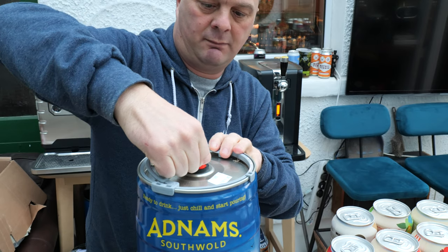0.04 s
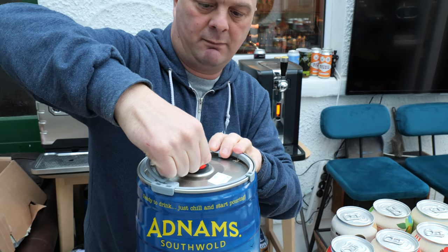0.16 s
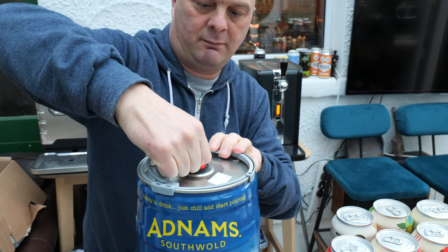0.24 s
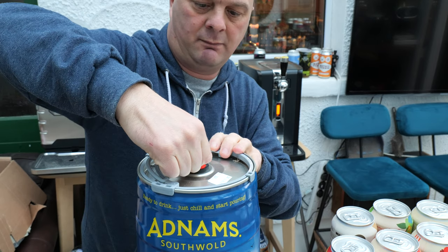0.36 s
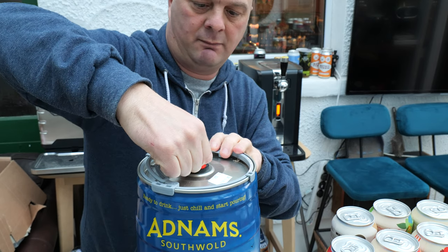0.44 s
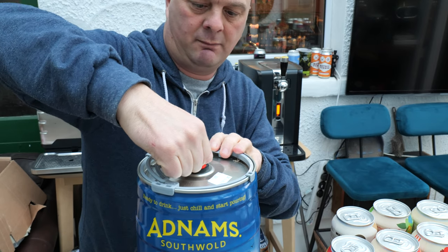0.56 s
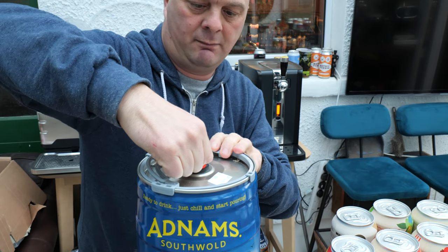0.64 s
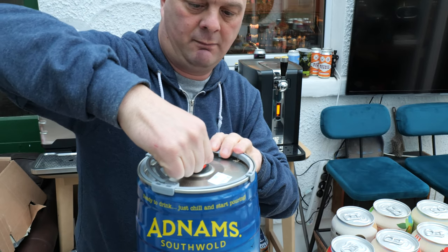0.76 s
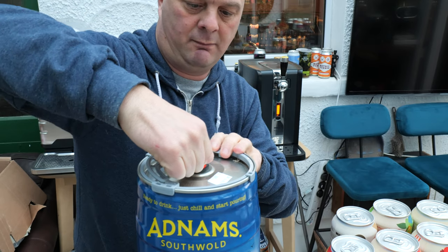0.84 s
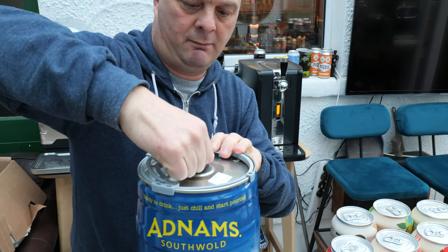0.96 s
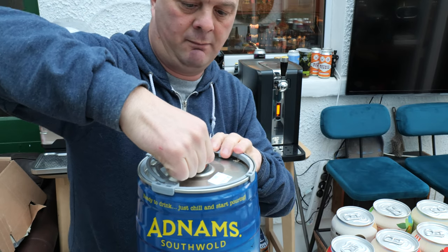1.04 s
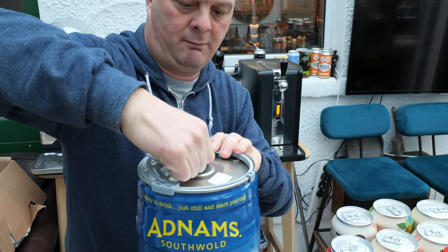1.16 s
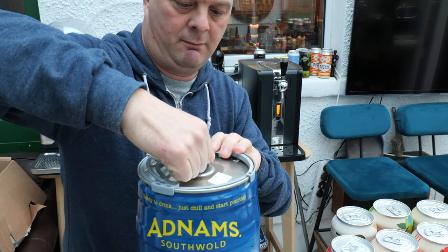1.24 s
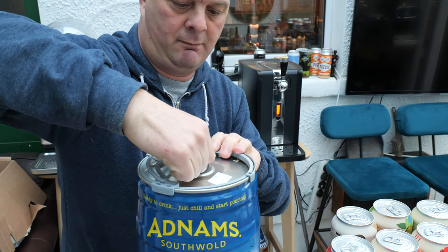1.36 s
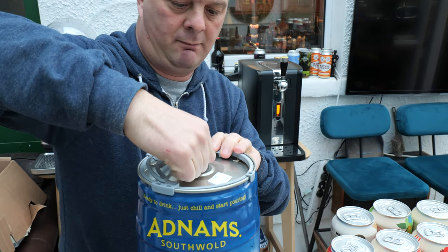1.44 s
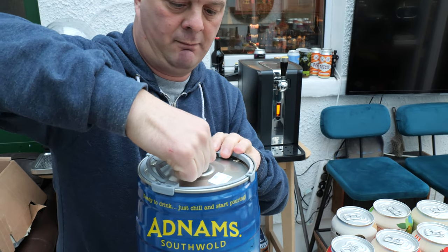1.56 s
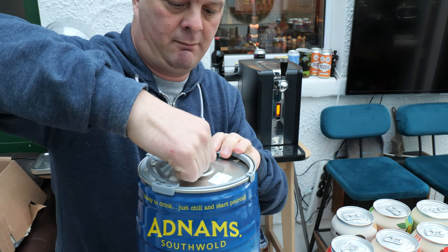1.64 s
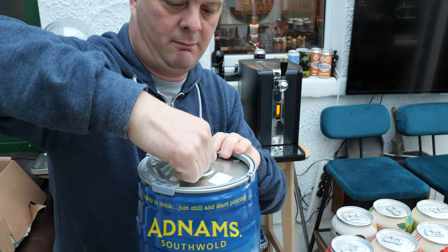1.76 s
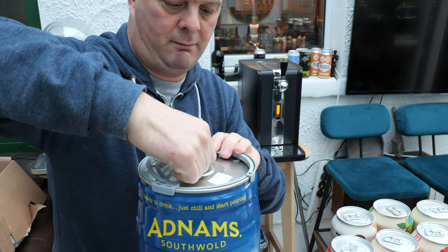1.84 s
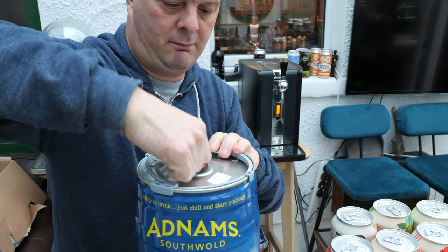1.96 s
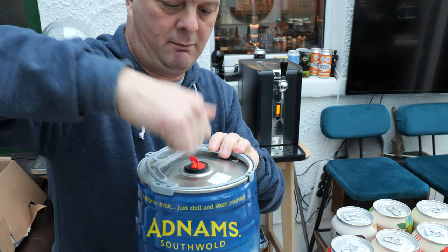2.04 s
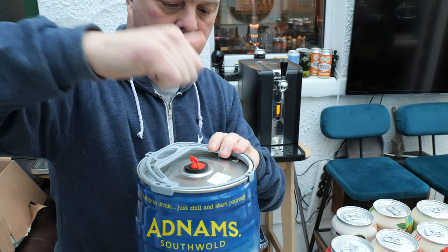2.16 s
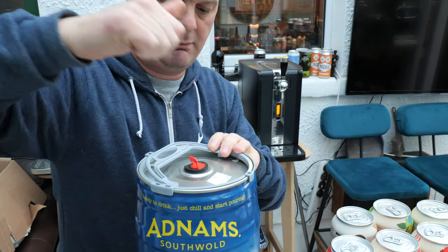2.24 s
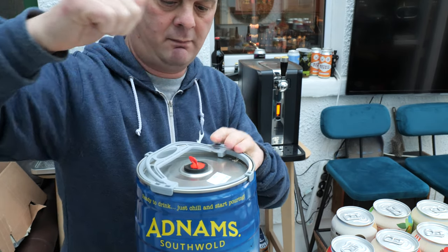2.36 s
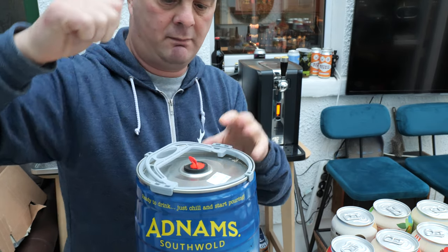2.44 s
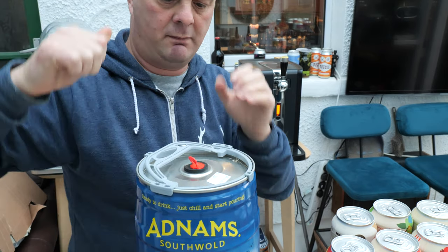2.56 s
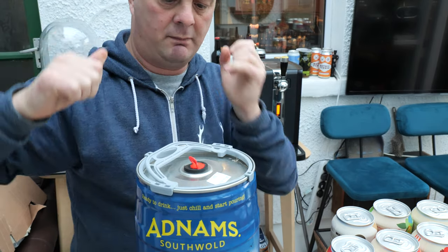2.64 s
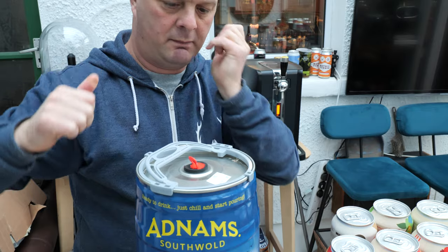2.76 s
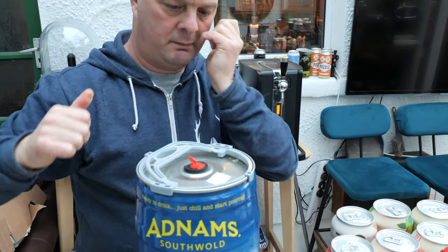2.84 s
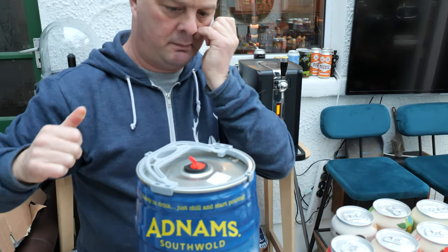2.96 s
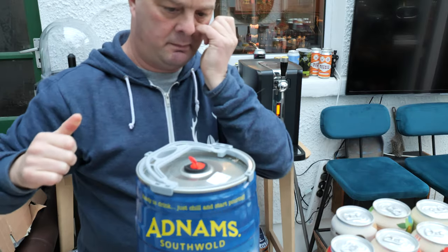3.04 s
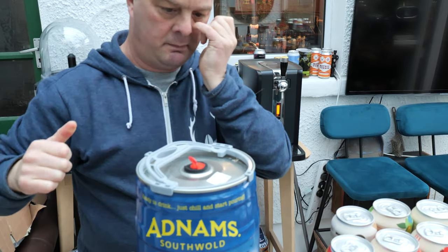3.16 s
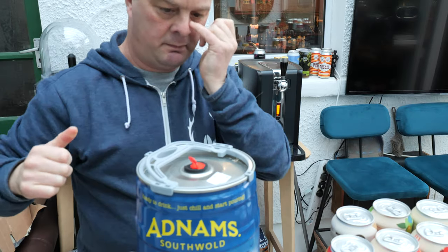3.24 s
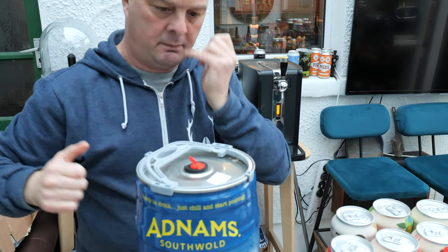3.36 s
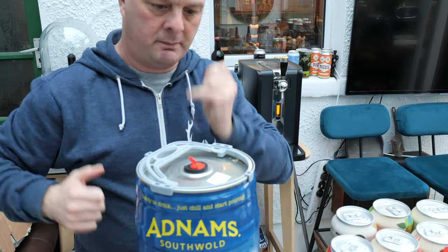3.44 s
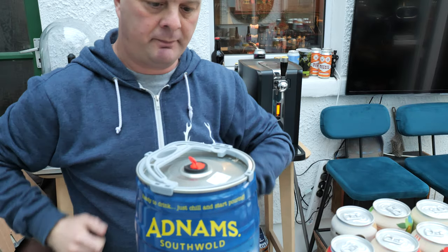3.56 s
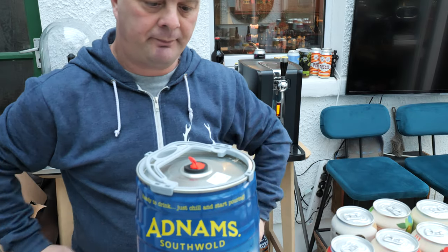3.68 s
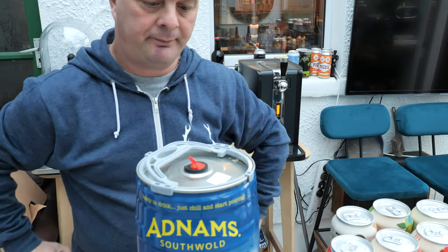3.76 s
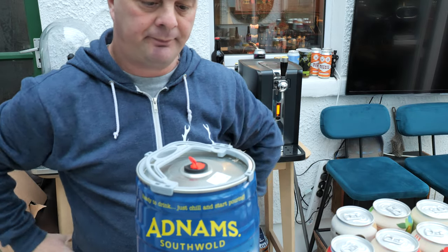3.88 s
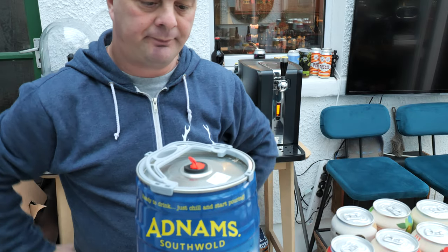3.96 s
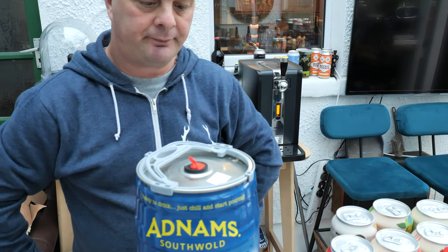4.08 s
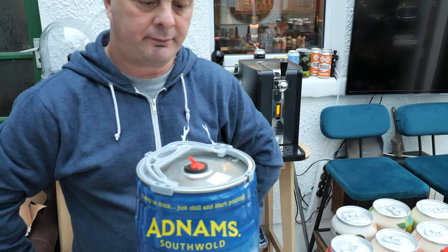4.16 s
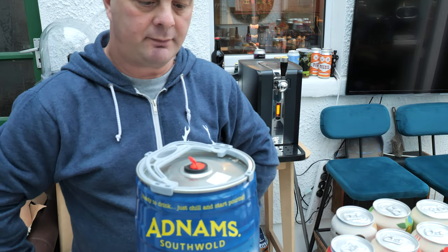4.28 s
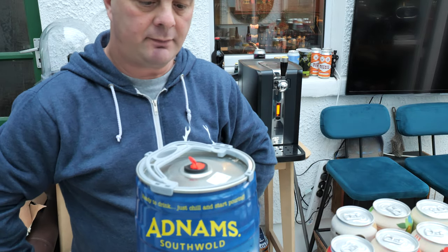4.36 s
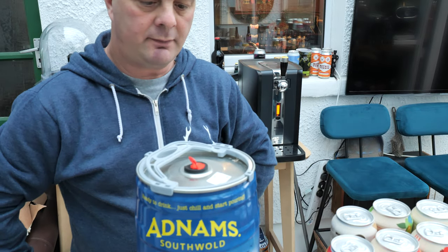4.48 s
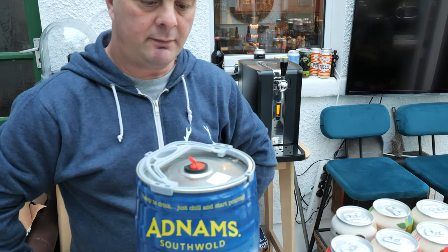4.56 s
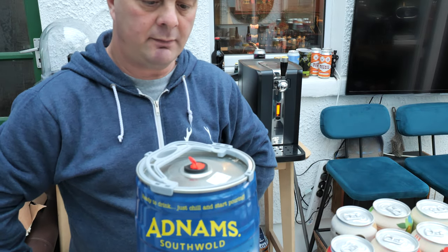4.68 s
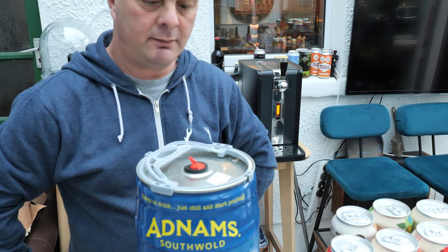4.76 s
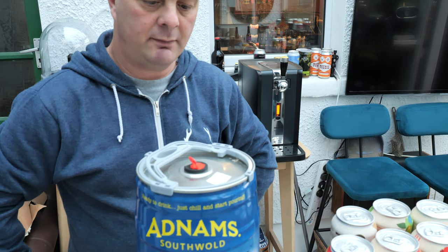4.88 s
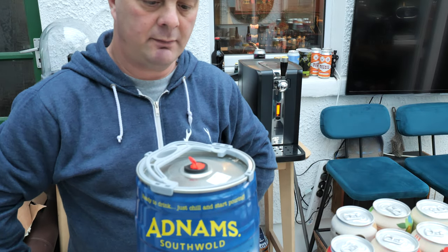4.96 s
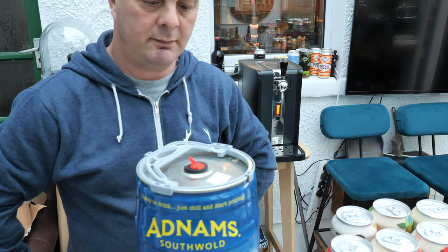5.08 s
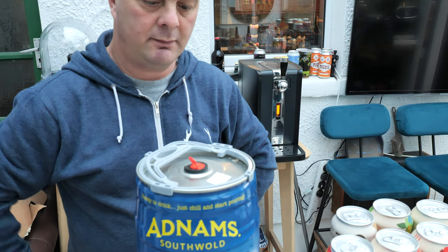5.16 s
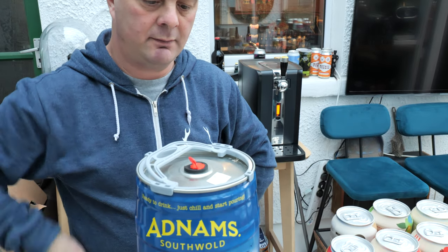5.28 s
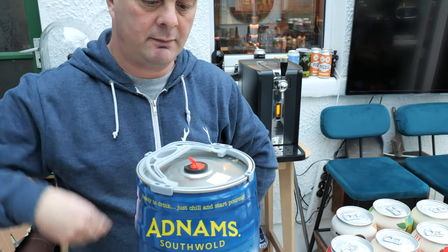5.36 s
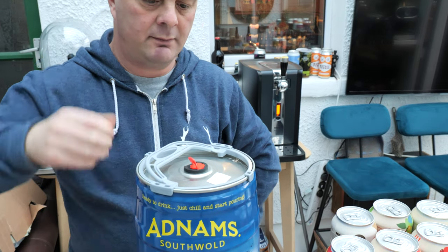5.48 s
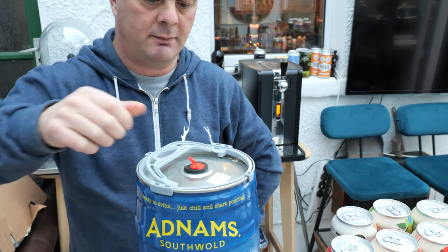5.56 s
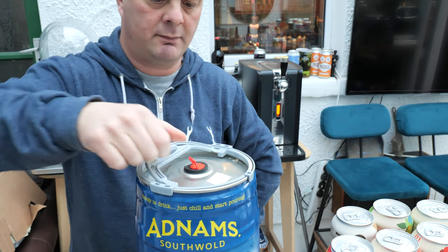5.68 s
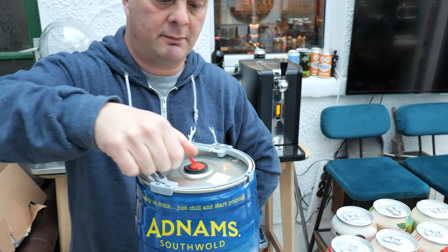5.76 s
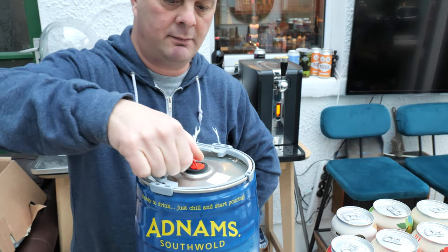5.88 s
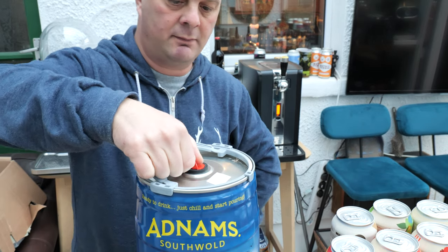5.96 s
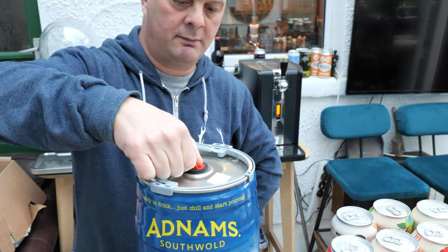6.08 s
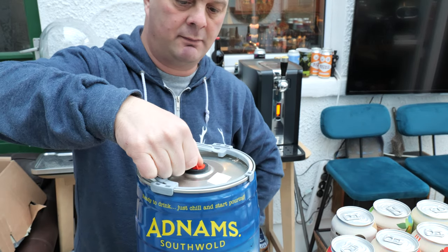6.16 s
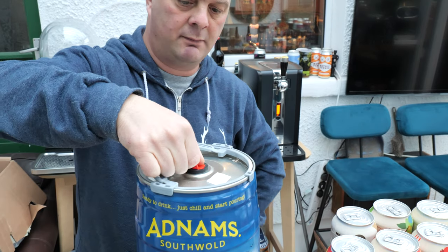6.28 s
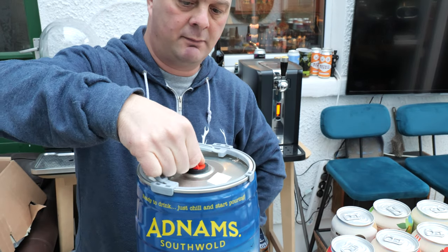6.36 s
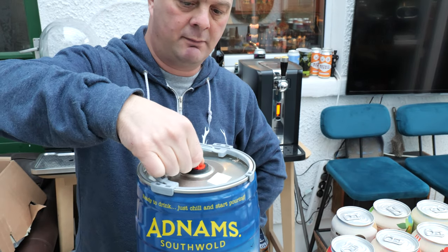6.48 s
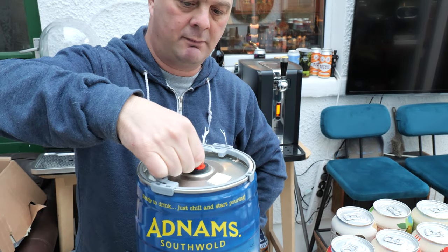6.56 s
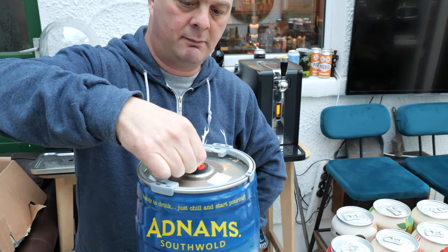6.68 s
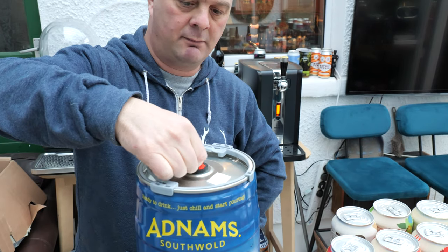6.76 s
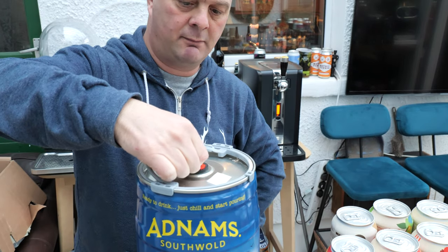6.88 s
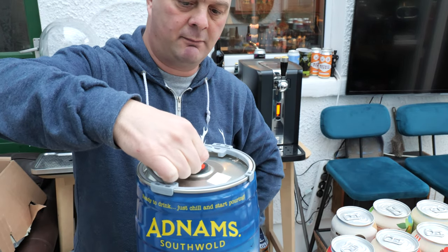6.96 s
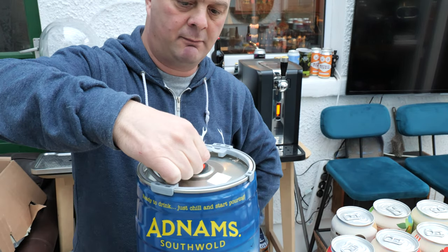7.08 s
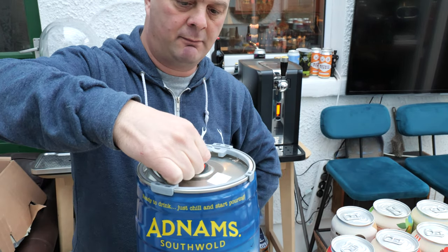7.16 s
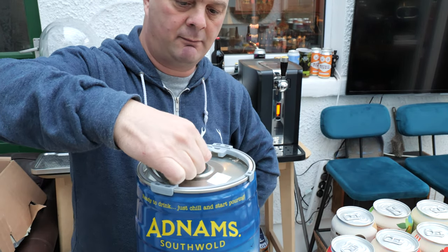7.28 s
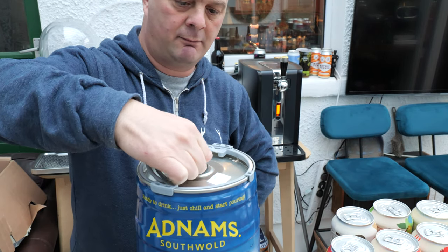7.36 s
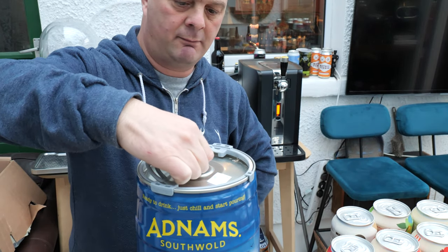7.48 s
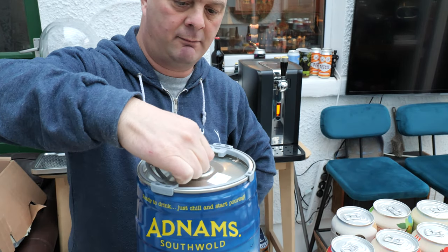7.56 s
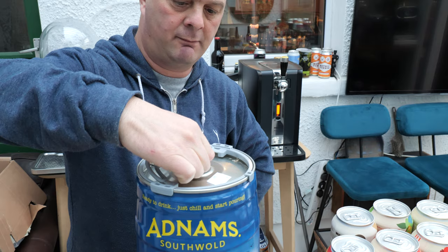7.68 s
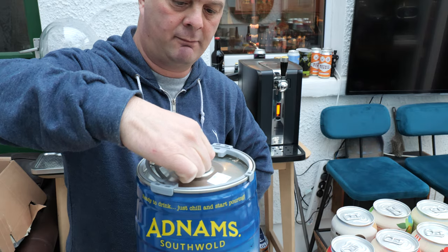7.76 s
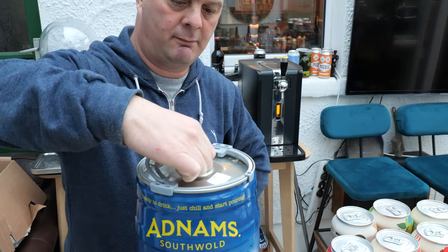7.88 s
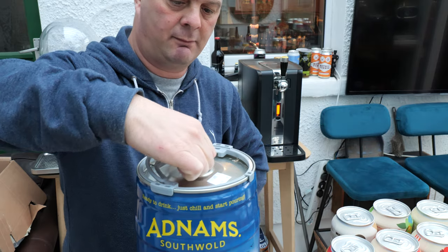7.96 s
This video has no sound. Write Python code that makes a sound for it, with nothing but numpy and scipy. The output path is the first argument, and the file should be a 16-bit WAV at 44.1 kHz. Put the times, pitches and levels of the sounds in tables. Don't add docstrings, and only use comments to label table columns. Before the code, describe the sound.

Gas bursts from a small steel keg's tap in a strong bright hiss, then slowly fades over a low humming cooler in a room.

```python
import sys
import numpy as np
from scipy import signal
from scipy.io import wavfile
from scipy.ndimage import uniform_filter1d

SR = 44100
rng = np.random.default_rng(int(sys.argv[2]) if len(sys.argv) > 2 else 0)


def makeup_ratio(level_db):
    decades = np.asarray(level_db, float) / 20
    return 10 ** decades


def materialize(psi):
    bounded = np.clip(np.atleast_2d(psi).T, -1, 1)
    quanta = np.round(bounded * 32767).astype(np.int16)
    wavfile.write(sys.argv[1], SR, quanta)


N = 354152

# (frequency [Hz], density [dB per Hz])
ROOM_COLOUR = [(20, -43), (38, -26), (58, -8), (95, -12.5), (200, -4.5), (250, -8.5), (450, -14.5),
               (1400, -15.5), (2300, -24.5), (3000, -22), (4200, -33), (6000, -42), (16000, -62)]
# (frequency [Hz], width [Hz], level [dB])
FAN_TONES = [(135, 21, 0), (182, 11, 2), (211, 10, 4.5), (278.5, 4.8, 6.5), (290, 6.1, 4.5), (376, 10, 5.5),
             (560, 63, 7), (1017, 32, 6.5), (1410, 66, 6.5), (1910, 76, 4), (2223, 40, 8), (2890, 72, 3.5)]
# (time [s], length [s], swell [dB])
TRAFFIC = [(1.17, .2, 6), (2.6, 1.2, 5), (4.07, .15, 8), (4.55, .12, 8), (6.06, 0.16, 2)]
# (frequency [Hz], rms [dB])
MOTOR_TONES = [(186.5, -61), (375, -75)]
# (frequency [Hz], rms [dB], wander [dB], share of the lulls [1])
UNSTEADY_TONES = [(134.4, -73.5, 1.5, 0), (225.6, -64, 2, 1.1), (275.6, -68, 1.5, 1.1), (293, -69, 1.5, 0)]
# (time [s], length [s], level [dB])
COOLER_LULLS = [(0.33, 0.35, -5), (2.08, 0.27, -13), (4.6, 0.61, -14), (7.75, 0.42, -22)]
# (time [s], length [s], level [dB])
LOW_TONE_SURGES = [(1.9, .6, 6), (3.0, 0.95, 14), (4.3, 1.5, 5.5), (6.26, 0.75, 7.5), (7.38, 0.23, 9),
                   (8.0, .3, 8)]
# (time [s], peak [dB], pitch [Hz], t60 [s])
BUMP_MODES = [
    (1.544, -54, 1000, .05),
    (4.507, -37, 720, 0.025),
    (4.889, -39, 310, 0.063),
    (4.891, -38, 158, .05),
    (4.889, -52, 60, .08),
    (5.797, -40, 1860, 0.035),
    (5.797, -47, 1640, .03),
]
# (frequency [Hz], peak [dB], t60 [s])
SHELL_MODES = [(760.4, -51, 0.44), (760, -44.5, 0.98), (800, -41.5, 0.26)]
# (time [s], level [dB], frequency [Hz])
WHISTLE = [(6.295, -78, 2650), (6.33, -58, 2650), (6.35, -70, 2640), (6.39, -64, 2660), (6.42, -63, 2675),
           (6.45, -63, 2670), (6.47, -80, 2560)]
# (time [s], hiss level [dB])
GAS_FLOW = [(1.5, -84), (1.52, -84), (1.56, -61), (1.69, -37.5), (2.1, -36.5), (2.98, -37), (4.21, -40.5),
            (5.48, -47.5), (6.0, -51), (6.27, -53), (6.5, -55), (6.95, -57), (7.17, -54.5), (7.39, -56),
            (7.7, -63), (8.03, -72)]
# (time [s], pose [0 just cracked, 1 gripping, 2 away, 3 fingers on tap, 4 palm over lid, 5 turning shut])
HAND_POSE = [
    (1.62, 0),
    (1.7, 1),
    (2.01, 1),
    (2.15, 2),
    (5.55, 2),
    (5.98, 3),
    (6.25, 3),
    (6.38, 4),
    (6.9, 4),
    (7.1, 5),
]
# (time [s], length [s], body [dB], hollow [dB])
FINGER_SHIFTS = [(1.92, 0.14, 4, -1), (2.005, .05, 0, 3), (2.1, 0.13, 0, -4), (2.353, 0.12, 2, 2),
                 (2.52, .06, 0, 2), (5.4, .4, 0, -1), (5.982, .06, -1, 2)]
# (low edge [Hz], high edge [Hz])
LAYER_BANDS = [(3600, 11000), (11400, 15600), (2700, 3500), (1300, 2500)]
# (shrill top [dB], tap hollow [dB], low rush [dB])
POSE_SHADE = [(-2.5, -8.5, -12), (-1, -6.5, -11), (2, -6, -12), (0.5, -8, -12), (-6.5, -9.5, -14.5),
              (-2.5, -6, -13)]
# (frequency [Hz], density [dB per Hz])
GRIPPED_COLOUR = [(300, -21.5), (1000, -14.5), (2000, -7), (2600, -5.5), (5000, -6.5), (8000, -8),
                  (11000, -6.5), (14000, -7), (14500, -12), (16000, -18)]
# (frequency [Hz], density [dB per Hz])
FREE_COLOUR = [(300, -21.5), (1000, -14), (2200, -8.5), (5000, -10.5), (8000, -8), (11000, -7), (13500, -7),
               (15200, -10.5), (16000, -17)]
# (frequency [Hz], density [dB per Hz])
TOUCHED_COLOUR = [(300, -16), (1000, -12), (2200, -9), (5000, -11), (8000, -8.5), (11000, -8), (13800, -7),
                  (16000, -32)]
# (frequency [Hz], density [dB per Hz])
COVERED_COLOUR = [(300, -12), (1000, -9), (2200, -5), (5000, -7), (8000, -5.5), (11000, -11.5),
                  (14000, -11), (16000, -20)]
# (frequency [Hz], width [Hz], level [dB])
CRACKED_HOLLOWS = [(3020, 560, 13), (4680, 400, -4), (5540, 130, -6), (5930, 450, 5), (7200, 1100, -6),
                   (8260, 500, 5), (10000, 700, 10), (11500, 300, 7), (12400, 250, -10), (13000, 700, 7),
                   (15000, 800, -10)]
# (frequency [Hz], width [Hz], level [dB])
GRIPPED_HOLLOWS = [(3130, 400, 7), (4720, 320, -4.5), (5930, 240, 2), (7200, 370, 7), (7650, 250, 2),
                   (8400, 800, 6), (9950, 600, 4.5), (12200, 800, -4), (12900, 450, 6), (15100, 300, 0)]
# (frequency [Hz], width [Hz], level [dB])
FREE_HOLLOWS = [(1500, 320, 2), (3110, 450, 5.5), (3096, 110, 4), (4080, 130, -5.5), (4590, 230, -2.5),
                (5100, 370, 1.5), (6990, 570, 4), (7530, 280, -0.5), (8320, 780, 3.5), (10120, 800, 2.5),
                (11300, 510, -4), (11980, 410, 5), (12620, 950, 5.5)]
# (frequency [Hz], width [Hz], level [dB])
TOUCHED_HOLLOWS = [(2940, 500, 5), (4570, 410, -1.5), (5200, 230, 7.5), (8060, 450, 6.5), (10950, 450, -11),
                   (12200, 700, 3), (12700, 250, -3), (13500, 400, -3)]
# (frequency [Hz], width [Hz], level [dB])
COVERED_HOLLOWS = [(3100, 540, 6), (3730, 180, 4.5), (4550, 710, -4.5), (5250, 300, 5), (6100, 300, 4),
                   (7150, 250, 4), (8500, 800, 4.5), (11250, 500, -4), (12200, 1000, 4), (14800, 400, -6)]
# (frequency [Hz], width [Hz], level [dB])
CLOSING_HOLLOWS = [(3040, 450, 6.5), (3830, 300, 3), (4700, 300, -4), (5250, 350, 1.5), (6100, 300, 0),
                   (7100, 300, 0), (8200, 500, 5), (11800, 200, -5), (12300, 150, -5), (13500, 1600, 6)]

ROOM_DB, CAPSULE_HISS_DB = -58, -69
MURMUR_HZ, MURMUR_DB = 70, -86.5
SLACK_DB, CHOKED_DB = -39.5, -60
SHRILL_SAG, SHRILL_CHOKE, HOLLOW_SAG, RUSH_SAG = 0.23, 0.9, -0.13, -0.26
RUSH_EASE = -0.31
LET_GO_S, CLEAR_S, NEAR_DB = 2.05, 0.56, -3.5


def evened(x):
    return x / np.sqrt(np.mean(x ** 2) + 1e-20)


def humps(t, rows):
    return sum(db * np.exp(-4 * np.log(2) * ((t - s) / length) ** 2) for s, length, db in rows)


def colour_db(hz, points, peaks):
    f, db = np.transpose(points)
    bells = sum(d * np.exp(-4 * np.log(2) * ((hz - c) / w) ** 2) for c, w, d in peaks)
    return np.interp(np.log(hz + 1), np.log(f), db) + bells


def noise(gain):
    a, b = rng.standard_normal(gain.T.shape + (2,)).T
    size = 2 * len(gain) - 2
    x = signal.istft(gain * (a + 1j * b), window="cosine", nperseg=size)[1][:N]
    return x * np.pi / np.sqrt(8 * size)


def drift(shape, bins, frames):
    grain = rng.standard_normal(shape[::-1]).T
    return evened(uniform_filter1d(uniform_filter1d(grain, bins, 0), frames, 1))


def capsule_noise():
    white, low = rng.standard_normal((N, 2, 2)).T
    murmur = signal.lfilter(*signal.butter(2, MURMUR_HZ, fs=SR), low)
    return makeup_ratio(CAPSULE_HISS_DB) * white + makeup_ratio(MURMUR_DB) * evened(murmur)


def room():
    hz, frames = np.fft.rfftfreq(8192, 1 / SR), N // 4096 + 5
    t = np.arange(frames) * 4096 / SR
    swell_db = humps(t, TRAFFIC) - 1.5 + 1.2 * drift((1, frames), 1, 2)[0]
    lull_db = 0.39 * humps(t, COOLER_LULLS)
    field = colour_db(hz, ROOM_COLOUR, FAN_TONES)[:, None] + np.outer(hz < 125, swell_db)
    field += np.outer(abs(hz - 250) < 40, lull_db)
    field += 0.95 * drift((len(hz), frames), 60, 2)
    return makeup_ratio(ROOM_DB) * evened(noise(makeup_ratio(field)))


def motor_hum():
    t, out = np.arange(N) / SR, np.zeros(N)
    lull_db, surge_db = humps(t, COOLER_LULLS), humps(t, LOW_TONE_SURGES)
    tones = list(MOTOR_TONES)
    for (hz, db, wander_db, share), w in zip(UNSTEADY_TONES, drift((len(UNSTEADY_TONES), 40), 1, 2)):
        slow = np.interp(t, np.linspace(0, t[-1], 40), w)
        tones.append((hz, db + wander_db * slow + share * lull_db + (hz < 150) * surge_db))
    for hz, db in tones:
        pitch, strength = (np.interp(t, np.linspace(0, t[-1], 120), w) for w in drift((2, 120), 1, 2))
        phase = 2 * np.pi * np.cumsum(hz + 1.2 * pitch) / SR
        out += makeup_ratio(db + 2.0 + 1.77 * strength) * np.sin(phase)
    return out


def dying_mode(start_s, db, hz, t60_s, rise_s):
    t, out = np.arange(SR // 2) / SR, np.zeros(N)
    tone = makeup_ratio(db - 60 * t / t60_s) * np.sin(2 * np.pi * hz * t)
    out[round(start_s * SR):][:len(t)] = tone * (1 - np.exp(-t / rise_s))
    return out


def bumps():
    return sum(dying_mode(*bump, rise_s=0.0025) for bump in BUMP_MODES)


def keg_shell():
    return sum(dying_mode(2.003, db, hz, t60_s, rise_s=0.0021) for hz, db, t60_s in SHELL_MODES)


def squeak():
    s, db, hz = np.transpose(WHISTLE)
    t = np.arange(N) / SR
    tremor_hz = 15 * drift((1, N), 1, 310)[0]
    phase = 2 * np.pi * np.cumsum(np.interp(t, s, hz) + tremor_hz) / SR
    return makeup_ratio(np.interp(t, s, db + 5.5, -140, -140)) * np.sin(phase)


def layers(t, pose):
    flow = np.interp(t, *np.transpose(GAS_FLOW), -140)
    released = t > LET_GO_S
    slack = np.minimum(flow - SLACK_DB, 0) * released
    choked = np.minimum(flow - CHOKED_DB, 0) * released
    shrill, hollow, rush = (flow + np.interp(pose, np.arange(len(POSE_SHADE)), db)
                            for db in np.transpose(POSE_SHADE))
    near = NEAR_DB * np.exp(-np.maximum(t - LET_GO_S, 0) / CLEAR_S) * np.clip(pose - 1, 0, 1)
    s, length, body_db, hollow_db = np.transpose(FINGER_SHIFTS)
    body = flow + humps(t, zip(s, length, body_db))
    shrill = shrill + SHRILL_SAG * slack + SHRILL_CHOKE * choked + near
    hollow = hollow + HOLLOW_SAG * slack + humps(t, zip(s, length, hollow_db))
    rush = rush + RUSH_SAG * slack + RUSH_EASE * np.clip(flow - SLACK_DB, 0, 6)
    return body, shrill, hollow, rush


def jet():
    hz, t = np.fft.rfftfreq(512, 1 / SR), np.arange(N // 256 + 5) * 256 / SR
    poses = [(GRIPPED_COLOUR, CRACKED_HOLLOWS), (GRIPPED_COLOUR, GRIPPED_HOLLOWS),
             (FREE_COLOUR, FREE_HOLLOWS), (TOUCHED_COLOUR, TOUCHED_HOLLOWS),
             (COVERED_COLOUR, COVERED_HOLLOWS), (COVERED_COLOUR, CLOSING_HOLLOWS)]
    pose = np.interp(t, *np.transpose(HAND_POSE))
    field = sum(np.outer(colour_db(hz, *p), np.maximum(1 - abs(pose - k), 0)) for k, p in enumerate(poses))
    lift_db = []
    for (lo, hi), db in zip(LAYER_BANDS, layers(t, pose)):
        share = (makeup_ratio(field[(hz > lo) & (hz < hi)]) ** 2).sum(0) / len(hz)
        lift_db.append(db - 10 * np.log10(share))
    body, shrill, hollow, rush = lift_db
    joint_hz = [2300, 2750, 3400, 3800, 10800, 11600]
    joint_db = [np.minimum(rush, hollow + 6), hollow, hollow, body, body, shrill]
    for one, db in zip(np.eye(len(joint_hz)), joint_db):
        field += np.outer(np.interp(hz, joint_hz, one), db)
    field += 0.9 * drift(field.shape, 2, 30)
    field += 0.36 * drift((1, len(t)), 1, 3)
    field += 0.6 * drift(field.shape, 1, 8)
    return noise(makeup_ratio(field))


def scene():
    return np.tile(room() + motor_hum() + bumps() + keg_shell() + squeak() + jet(), (2, 1))


def roll_off(x):
    return signal.sosfilt(signal.butter(12, 15880, fs=SR, output="sos"), x)


def record(dry):
    mix = dry + capsule_noise()
    return roll_off(mix)


dry = scene()
out = record(dry)
materialize(out)
```